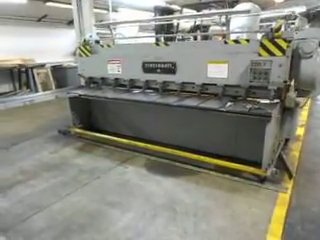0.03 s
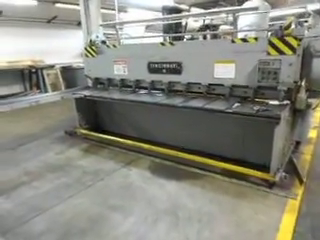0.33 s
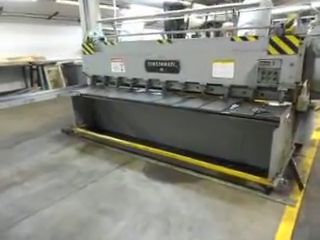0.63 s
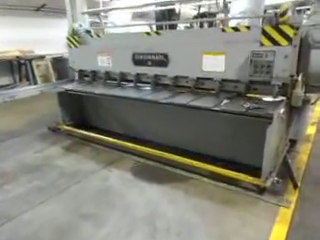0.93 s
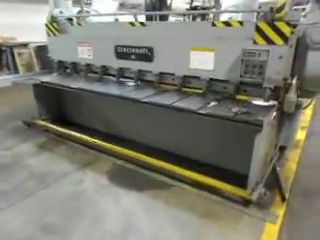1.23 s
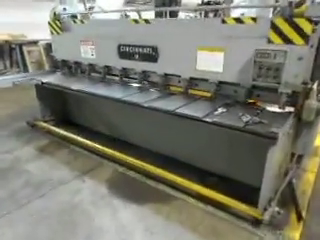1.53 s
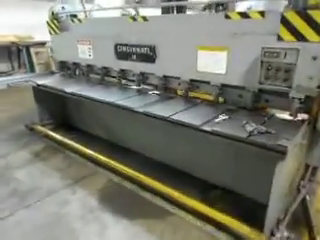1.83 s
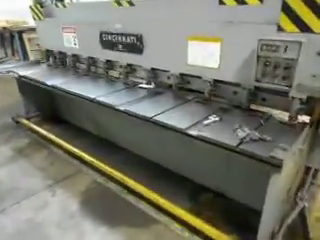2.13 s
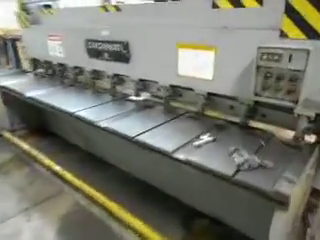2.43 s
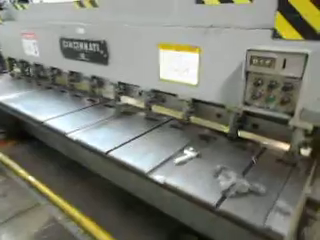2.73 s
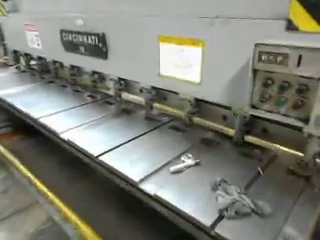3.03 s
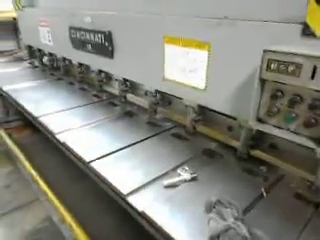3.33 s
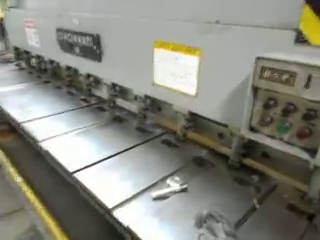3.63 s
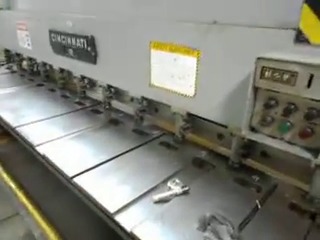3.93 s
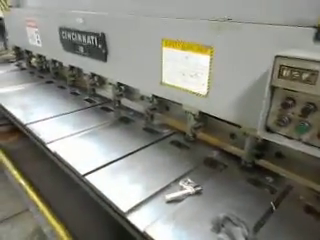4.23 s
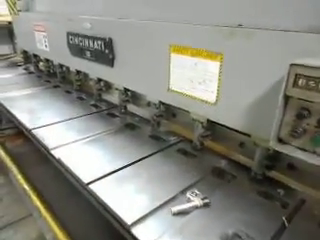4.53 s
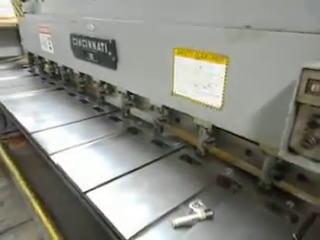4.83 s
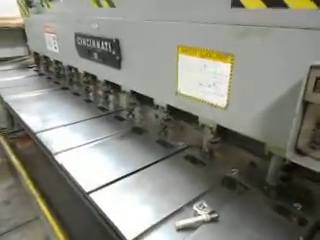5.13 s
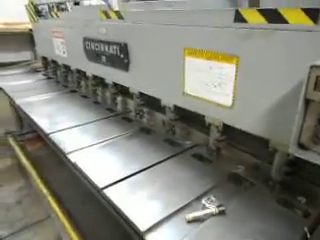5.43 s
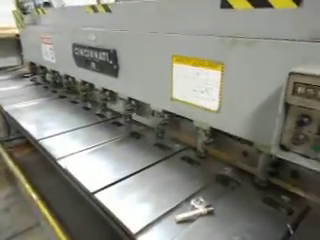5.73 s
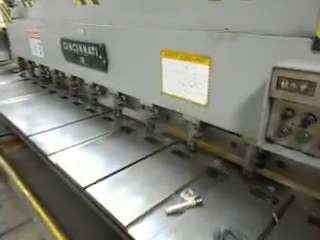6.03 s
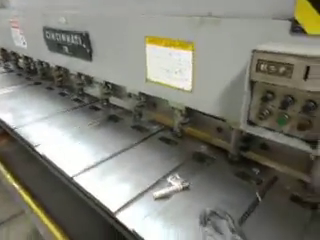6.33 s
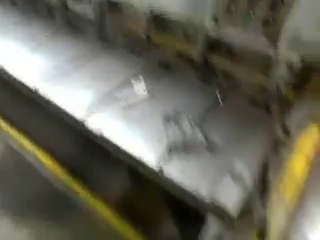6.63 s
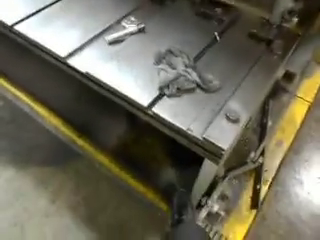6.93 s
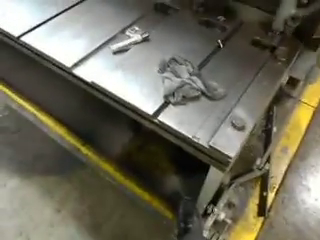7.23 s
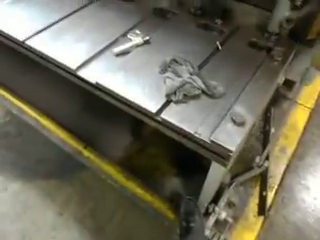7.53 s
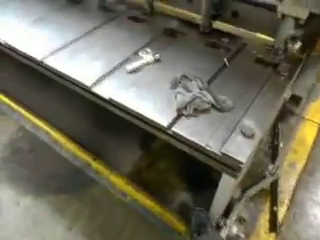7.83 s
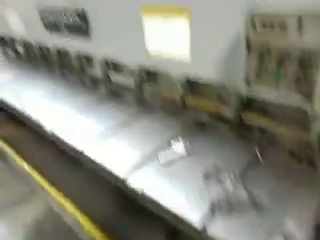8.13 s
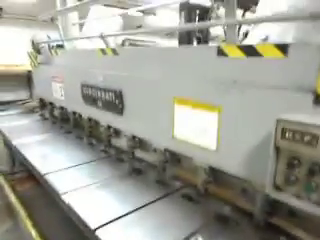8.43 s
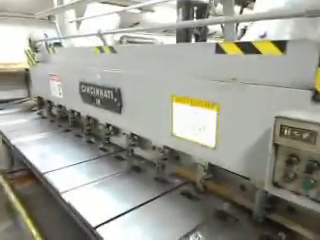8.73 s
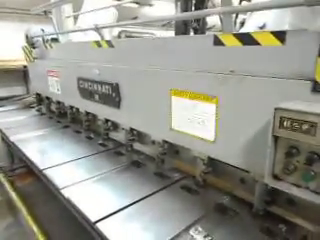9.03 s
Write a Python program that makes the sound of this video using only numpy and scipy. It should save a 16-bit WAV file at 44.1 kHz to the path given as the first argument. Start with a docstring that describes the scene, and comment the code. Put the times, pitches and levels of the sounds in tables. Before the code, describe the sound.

Heavy machinery runs steadily in an industrial hall: a low motor rumble, whining gears and a faint rubbing hiss. Then the metal shear makes two loud strokes about two seconds apart, each with steel clanking and slamming, a short blade scrape and a closing thud, followed by a light rattle. The small, nearby microphone distorts slightly on the echoing impacts. The idling carries on, with a lighter clank at the very end.

```python
"""A motor hums, gears whine and a rubbing clutch sizzles: a big sheet-metal shear idles in a workshop.
Twice the clutch clanks in, the hold-downs slam, the blade scrapes past and the ram stops with a thud;
a third clank begins at the end. Each impact excites the resonances of the steel and echoes in the hall.
The blows overload a small camera, whose gain control ducks at once and creeps back."""
import sys
import numpy as np
from scipy import signal
from scipy.fft import rfft, irfft, next_fast_len
from scipy.io import wavfile
from scipy.ndimage import uniform_filter1d, map_coordinates

SR = 44100
rng = np.random.default_rng(int(sys.argv[2]) if len(sys.argv) > 2 else 0)


def to_wav(s):
    """Save 16-bit WAV."""
    ch = np.atleast_2d(s).T  # columns
    pcm = np.round(np.clip(ch, -1, 1) * 32767)  # PCM
    wavfile.write(sys.argv[1], SR, pcm.astype(np.int16))


N = 401310

# strokes, timed by the hold-downs' slam: (t/s, force/dB, rebound/dB, ram landing/dB, pawl click/dB)
STROKES = [(4.881, -1.5, 12.5, -8, -6), (6.857, -4.5, 2.5, 8, -19)]
# heavy blows on the bed in each stroke: (t/s after the slam, level/dB, t60/s, frame ring/dB)
THUDS = [(0, 9.5, 0.086, -16), (.016, 7.5, 0.11, -7), (0.074, 2, .15, -28), (.137, 2, 0.15, -6),
         (0.5508, 9, 0.087, -24), (.572, 0, 0.07, -2), (0.61, 1, 0.14, -31)]
STOP_S, HOME_S = .554, .947  # after the slam: the ram stops, the pawl is home


def impacts():
    """Impact excitation: clanks ring fittings and brackets, thuds the bed, and the landing the ram."""
    # the tripped clutch clanking in: (t/s, level/dB, t60/s)
    trips = [(4.8454, 1, 0.13), (6.763, -2.5, 0.08), (6.767, 1, 0.08), (6.788, -1, .08),
             (9.045, -15.5, 0.11), (9.061, -17, 0.23)]
    # steel on steel at hold-downs and brake: (t/s after the slam, level/dB, t60/s)
    stroke_clanks = [(0, 9.5, 0.09), (.5465, 0, 0.22)]
    # resonances of small fittings, heavy brackets and the panelled bed: (f/Hz, width/Hz, level/dB)
    fittings = [(1028, 110, -4.5), (1200, 87, 6.5), (1510, 280, 1.5), (2090, 210, -2), (3420, 350, -11),
                (4260, 330, -11.5)]
    brackets = [(430, 58, 2.5), (650, 110, 3), (783, 104, 3), (966, 60, -1)]
    bed = [(204.6, 32, 2), (285, 22.5, 0.5), (399, 39, -2.5), (454, 12.4, -4.5), (880, 420, -24)]
    # spectrum of struck steel: (f/Hz, level/dB)
    steel = [(100, -8), (600, 12), (1400, 2), (2700, -27), (4500, -4), (6500, -17), (10000, -16.5)]
    # modes of the ram: (f/Hz, level/dB, t60/s)
    ram_modes = [(217, 1.5, 0.043), (383, -9, 0.094), (443, 1, 0.089)]
    # the hold-downs rebound: a thud with a clank just behind it
    rebounds = [(s + .037, db, 0.055) for s, _, db, _, _ in STROKES]
    clanks = trips + each_stroke(stroke_clanks) + [(s + 0.0112, db - 3, t60) for s, db, t60 in rebounds]
    thuds = each_stroke(THUDS) + rebounds + [(s, db - 11.5, t60) for s, db, t60 in trips]
    stops = [(s + STOP_S, db) for s, _, _, db, _ in STROKES]
    # each clank darkens: the low resonances swell later and outlast the high ones
    short = [(s, db, 0.9 * t60) for s, db, t60 in clanks]
    clang = amp(-3.5) * resonant(fittings) + amp(-10) * plate(steel, ripple_db=7)
    bright = blows(short, attack=0.00073) * clang
    dark = blows(clanks, attack=0.0077) * amp(-1) * resonant(brackets)
    boom = blows(thuds, attack=0.0023) * resonant(bed)
    return bright + dark + boom + struck(stops, ram_modes, attack=0.0018)


def blade():
    """Sliding friction: the blade catches unevenly on its guides, pressing harder until it is through."""
    # spectrum of the scrape: (f/Hz, level/dB)
    spectrum = [(60, 3), (200, 5), (400, 1.5), (520, -7), (850, 1), (1300, -9), (2000, -6), (2700, -13.5),
                (4200, -11.5), (6500, -14.5), (10000, -12.5)]
    pressure = forced(held(0, end=.133, rise_s=0.099, fall_db_per_s=430))
    return pressure * amp(3.5 + 2.2 * wobble(160)) * plate(spectrum, ripple_db=1.5)


def frame():
    """Free vibration: thuds ring the heavy frame, and each slam sets it rocking on its footing."""
    # low modes of the whole frame: (f/Hz, level/dB, t60/s)
    modes = [(70, 4, 0.21), (94.1, 0, 1), (118.7, 0, 0.37)]
    # spectrum of the rocking: (f/Hz, level/dB)
    rocking = [(15, -8), (25, -6), (34, -15), (44, -1), (53, -9), (75, -15), (130, -52.5)]
    hits = each_stroke([(after, ring_db) for after, _, _, ring_db in THUDS])
    ring = struck(hits, modes, attack=0.0035)
    jolt = amp(-15) * held(0, .04, rise_s=.04, fall_db_per_s=70)
    rock = amp(-19) * held(0, HOME_S, rise_s=.04, fall_db_per_s=21)
    return ring + forced(jolt + rock) * noise(rocking)


def labour():
    """Tooth contact noise: loaded gears growl; released, they rattle in their backlash."""
    # spectrum of the labouring gears: (f/Hz, level/dB)
    spectrum = [(60, -12.5), (120, -0.5), (180, 1), (260, -2.5), (420, -3.5), (560, -10), (900, -12.5),
                (1400, -12.5), (2100, -18), (2800, -19.5), (4300, -21), (6500, -26.5), (10000, -48)]
    growl = amp(-15) * forced(held(0, STOP_S, rise_s=.15, fall_db_per_s=11))
    rattle = amp(-14) * forced(held(HOME_S, HOME_S, rise_s=0.016, fall_db_per_s=8.5))
    return np.hypot(growl, rattle) * amp(0.6 * wobble(27)) * plate(spectrum, ripple_db=1.3)


def drive():
    """Rotating machinery: motor and flywheel rumble, shafts hum, gears rush and whine as teeth mesh."""
    # the idling drive as the listener walks up: (t/s, rumble/dB, gear rush/dB)
    approach = [(0, -25.5, -27.8), (1.2, -26, -28), (2.4, -24, -28.2), (3.4, -24.5, -31.3),
                (4.6, -23.5, -29.6), (6.6, -21.8, -28.3), (9.1, -23.5, -29)]
    # spectra of rumble and gear rush: (f/Hz, level/dB)
    rumble_spectrum = [(20, -15), (35, -18), (50, -7.5), (105, -5.5), (150, 0), (220, -2.5), (340, -7.5),
                       (410, -3), (520, -10), (900, -28.5), (2000, -48)]
    rush_spectrum = [(150, -14), (450, 1.5), (620, -3), (850, 1.5), (1050, 5), (1400, -1.5), (2000, -9.5),
                     (2700, -16), (3600, -13), (4250, -12), (4900, -16.5), (6500, -20), (10000, -23)]
    # lines of motor and shafts: (f/Hz, level/dB)
    hum_lines = [(96, -57), (121.5, -33), (135.5, -40.5), (162, -31.5), (183.3, -34), (243, -40.5),
                 (329, -41.5), (398.4, -39.5), (657, -44), (1314, -42), (1647, -54), (1976, -53.5),
                 (4274, -55), (8226, -56.5)]
    # lower shaft sideband and gear mesh: (f/Hz, level/dB)
    mesh_lines = [(986.4, -9), (1017.2, 2.6)]
    # the whine swelling in the room's standing waves: (t/s, level/dB)
    whine_swell = [(0.0, -27.5), (0.39, -28.5), (0.5, -33), (0.73, -26.5), (1.06, -29.5), (1.16, -24.5),
                   (1.28, -28), (1.41, -22.5), (1.52, -27.5), (1.55, -36), (1.98, -27.5), (2.01, -24),
                   (2.12, -39), (2.18, -24), (2.28, -22), (2.44, -33.5), (2.63, -21), (2.8, -36),
                   (3.05, -21.5), (3.41, -28), (4.3, -33.5), (4.84, -28.5)]
    rumble_db, rush_db = curves(approach)
    rumble = amp(rumble_db - 1.5 + 1.15 * wobble(12)) * noise(rumble_spectrum)
    rush = amp(rush_db + 3.5 + 0.51 * wobble(14)) * plate(rush_spectrum, ripple_db=2.5)
    # a slightly uneven speed smears the high lines most
    hum = sum(amp(db) * tone(hz, drift=.5 + hz / 900, flutter_db=2.5) for hz, db in hum_lines)
    (side_hz, side_db), (mesh_hz, mesh_db) = mesh_lines
    mesh = amp(mesh_db) * tone(mesh_hz, drift=0.35, flutter_db=0)
    sideband = amp(side_db) * tone(side_hz, drift=1, flutter_db=0.5)
    whine = amp(curves(whine_swell)[0] - 8 * engaged()) * (mesh + sideband)
    return rumble + rush + hum + whine


def clutch():
    """Dry friction: the clutch sizzles while disengaged, hardest just after it is freed."""
    # the idle rubbing: (t/s, level/dB)
    rub = [(.28, -47), (.36, -38.5), (2.1, -36.5), (3.6, -41), (4.8, -41.5)]
    # its spectrum: (f/Hz, level/dB)
    sizzle = [(2000, -35), (4000, -2), (7000, -8), (7900, 1.5), (8240, 5), (8600, 1), (9500, 1.5),
              (10400, -2.5)]
    flare = forced(held(HOME_S, HOME_S, rise_s=.05, fall_db_per_s=26))
    friction = amp(curves(rub)[0]) * (1 - engaged()) + amp(-28) * flare
    return friction * amp(2 + 3.3 * wobble(55)) * plate(sizzle, ripple_db=3.5)


def chime():
    """Mode splitting: struck by the pawl, the slightly unround clutch ring sounds clusters of tones."""
    # modes of the ring: (f/Hz, level/dB, t60/s)
    modes = [(3460, -6, 1), (3990, -5, 1), (4530, -8, .7), (5450, -4, 1), (6100, -8, 1), (8160, 1.5, 0.57),
             (8790, -17, .65), (9510, -12, .55)]
    clusters = [(hz * (1 + 0.012 * z), db, t60) for hz, db, t60 in modes for z in rng.standard_normal(5)]
    return struck(each_stroke([(HOME_S, -26)]), clusters, attack=.002)


def ticks():
    """Brief contacts give bright spectra: linkage, pawl and loose parts click."""
    # the linkage snapping over, lastly the pawl's rattle: (t/s after the slam, level/dB, t60/s)
    snaps = [(.101, -4, .04), (.127, 8.5, 0.034), (.563, -16.5, 0.74), (.947, -13.5, 0.45)]
    # stray ticks of loose parts: (t/s, level/dB, t60/s)
    strays = [(2.02, -29, 0.11), (5.794, -15.5, 0.041), (6.755, -15, 0.34), (6.80, -14, 0.062),
              (7.646, -7, 0.025), (9.046, -24, 0.83)]
    # spectrum of a click: (f/Hz, level/dB)
    spectrum = [(800, -11), (2500, 0), (4000, 1.5), (6200, 0), (7400, -5), (8400, -2), (9600, 0),
                (10500, -5.5)]
    pawl_clicks = [(s + HOME_S, db, .09) for s, *_, db in STROKES]
    return blows(each_stroke(snaps) + pawl_clicks + strays, attack=0.001) * plate(spectrum, ripple_db=1.5)


def treadle():
    """Modal ringing: the treadle rod pings as it is pushed."""
    # the push: (t/s, level/dB)
    pings = [(9.044, -21)]
    # modes of the rod: (f/Hz, level/dB, t60/s)
    modes = [(2920, -4, .15), (3400, -8, 0.35)]
    return struck(pings, modes, attack=.002)


def scuffs():
    """Amplitude-modulated noise: soft, brief hisses swell and fade."""
    # the hisses: (t/s, level/dB, half-length/s)
    hisses = [(0.562, -33.5, 0.028), (5.52, -18, 0.053), (5.666, -21, 0.0092), (6.256, -30, 0.0087),
              (6.503, -28.5, 0.015), (8.383, -28, 0.045), (8.5, -29, 0.055), (8.918, -35.5, 0.08)]
    # their spectrum: (f/Hz, level/dB)
    spectrum = [(1500, -1), (3000, -11.5), (4800, -4.5), (6200, -4.5), (7200, -12), (10000, -19)]
    swell = sum(amp(db) * np.exp(-.5 * ((clock() - s) / length) ** 2) for s, db, length in hisses)
    return swell * amp(3.8 * wobble(81)) * plate(spectrum, ripple_db=3.5)


def hall(x):
    """Reverberation: the workshop's diffuse echo decays exponentially, the treble first."""
    # reverberation time: (f/Hz, t60/s)
    decay = [(100, 1), (1000, 0.89), (4000, 0.96), (10000, 0.44)]
    hz, t, bins = signal.stft(rng.standard_normal(2 * SR), SR, nperseg=256)
    tail = signal.istft(bins * amp(-60 * t / along(decay, hz)[:, None]), SR, nperseg=256)[1]
    tail *= 1 - np.exp(-np.arange(len(tail)) / SR / 0.013)
    return signal.fftconvolve(x, tail / np.linalg.norm(tail))[:N]


def held(start, end, rise_s, fall_db_per_s):
    """One envelope per stroke: it rises at start, holds until end (s after the slam) and decays."""
    ages = [clock() - s for s, *_ in STROKES]
    return np.array([np.clip((t - start) / rise_s, 0, 1) * amp(-fall_db_per_s * np.maximum(t - end, 0))
                     for t in ages])


def forced(envelopes):
    """The strongest of the strokes' envelopes, each scaled by its force."""
    return np.max([amp(db) * envelope for (_, db, *_), envelope in zip(STROKES, envelopes)], axis=0)


def each_stroke(rows):
    """Rows of (t/s after the slam, level/dB, ...) repeated in every stroke, at its force."""
    return [(s + after, db + force, *rest) for s, force, *_ in STROKES for after, db, *rest in rows]


def engaged():
    """The clutch's grip, 0-1: from the slam until the pawl is home."""
    return held(0, HOME_S, rise_s=.1, fall_db_per_s=150).max(axis=0)


def blows(rows, attack):
    """Incoherent addition: the envelopes of exponentially dying blows sum in power."""
    power, t = np.zeros(N + SR), np.arange(SR) / SR
    for s, db, t60, *_ in rows:
        power[round(s * SR):][:SR] += (amp(db - 60 * t / t60) * (1 - np.exp(-t / attack))) ** 2
    return np.sqrt(power[:N])


def struck(hits, modes, attack):
    """Modal superposition: hits (t/s, level/dB) start damped sinusoids in random phases."""
    out, t = np.zeros(N + 2 * SR), np.arange(2 * SR) / SR
    phases = rng.uniform(0, 2 * np.pi, (len(hits), len(modes)))
    for (s, db), starts in zip(hits, phases):
        ring = sum(amp(level - 60 * t / t60) * np.sin(2 * np.pi * hz * t + phase)
                   for (hz, level, t60), phase in zip(modes, starts))
        out[round(s * SR):][:len(t)] += amp(db) * ring * (1 - np.exp(-t / attack))
    return out[:N]


def resonant(peaks):
    """Forced resonance: noise of rms 1 ringing in peaks (f/Hz, width/Hz, level/dB)."""
    def body(f):
        return sum((-1) ** k * amp(db) * 1j * f * width / (hz * hz - f * f + 1j * f * width)
                   for k, (hz, width, db) in enumerate(peaks))
    ring = filtered(rng.standard_normal(N), body)
    # held level, so that the force of a blow alone sets how loud it rings
    return ring / np.sqrt(np.abs(uniform_filter1d(ring ** 2, size=600)))


def plate(spectrum, ripple_db):
    """High modal density: noise through the crowded, unevenly strong modes of a steel part."""
    knots = np.arange(0, SR / 2, 45)  # Hz
    strengths = rng.standard_normal(len(knots))
    return unit(filtered(noise(spectrum), lambda hz: amp(ripple_db * np.interp(hz, knots, strengths))))


def noise(spectrum):
    """Coloured noise of rms 1."""
    return unit(filtered(rng.standard_normal(N), lambda hz: amp(along(spectrum, hz))))


def tone(hz, drift, flutter_db):
    """Random modulation: a line of rms 1 whose phase and strength wander."""
    return unit(amp(flutter_db * wobble(4)) * np.sin(2 * np.pi * hz * clock() + drift * wobble(3)))


def wobble(rate):
    """A smooth random curve, rate knots a second."""
    return map_coordinates(rng.standard_normal(int(N * rate / SR) + 4), [clock() * rate])


def filtered(x, response):
    """Linear filtering: the spectrum of x times a frequency response."""
    size = next_fast_len(N + SR // 2)
    return irfft(rfft(x, size) * response(np.fft.rfftfreq(size, 1 / SR)), size)[:N]


def lag(x, seconds):
    """One-pole smoothing."""
    keep = np.exp(-1 / (seconds * SR))
    return signal.lfilter([1 - keep], [1, -keep], x)


def curves(rows):
    """One value per sample for each column after the time."""
    s, *columns = np.transpose(rows)
    return [np.interp(clock(), s, column) for column in columns]


def along(points, hz):
    """(f/Hz, value) points read on a log axis."""
    f, values = np.transpose(points)
    return np.interp(np.log(hz + 1), np.log(f + 1), values)


def clock():
    """The time of every sample."""
    return np.arange(N) / SR


def amp(db):
    """Decibels to gain."""
    return 10 ** (np.asarray(db) / 20)


def unit(x):
    """x at rms 1."""
    return x / np.sqrt(np.mean(x ** 2) + 1e-20)


def gain_control(x, threshold_db, attack, release_db_per_s):
    """Compression: loud sound pulls the gain down; it climbs back at a steady pace."""
    level_db = 10 * np.log10(lag(x ** 2, 0.0051) + 1e-12)
    climb = release_db_per_s * clock()
    cut_db = np.maximum.accumulate(np.maximum(level_db - threshold_db, 0) + climb) - climb
    return x * amp(-lag(cut_db, attack))


def scene():
    """Superposition: the strokes and their echo over the running machine."""
    strokes = impacts() + blade()
    machine = drive() + labour() + clutch() + chime() + ticks() + treadle()
    return (strokes + machine + scuffs() + frame() + amp(-9.5) * hall(strokes))[None]


def record(dry):
    """Gain control, saturation and band limiting in the small camera."""
    # microphone response: (f/Hz, level/dB)
    microphone = [(10, -8), (24, 0), (10000, -1), (10450, -6), (10950, -18), (11800, -20.5), (12300, -32)]
    ceiling, top_hz = .68, 12350
    x = gain_control(dry[0], threshold_db=-14.5, attack=0.058, release_db_per_s=11.5)
    x = x / (1 + np.abs(x / ceiling) ** 8) ** (1 / 8)
    return filtered(x, lambda hz: amp(along(microphone, hz)) * (hz < top_hz))[None]


dry = scene()
out = record(dry)
to_wav(out)
```